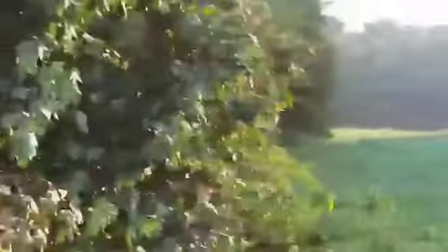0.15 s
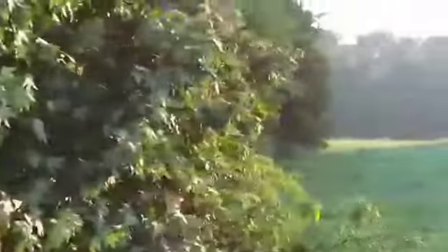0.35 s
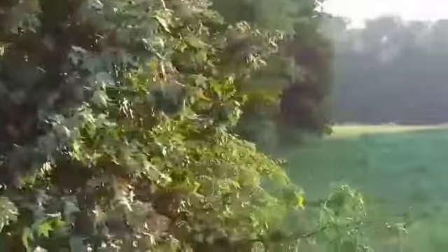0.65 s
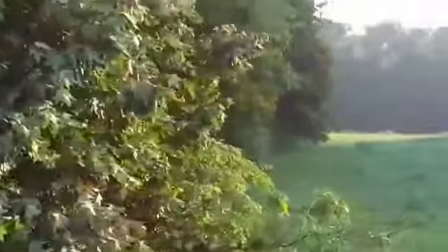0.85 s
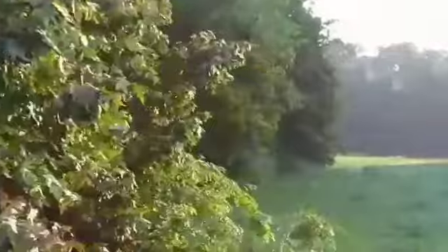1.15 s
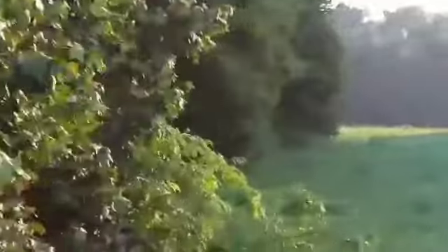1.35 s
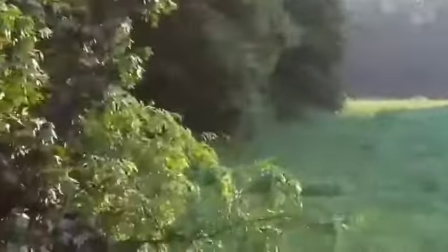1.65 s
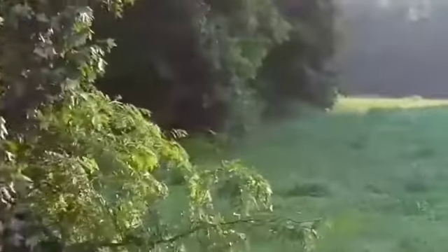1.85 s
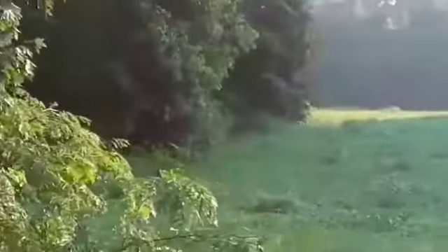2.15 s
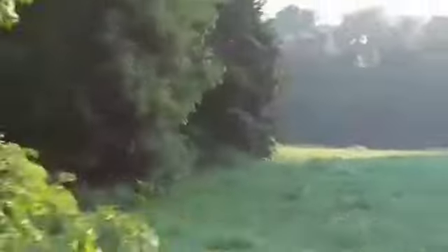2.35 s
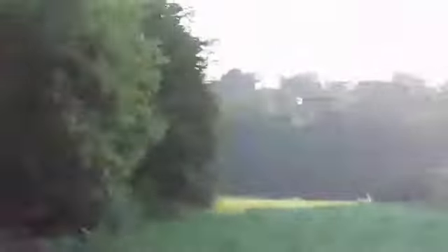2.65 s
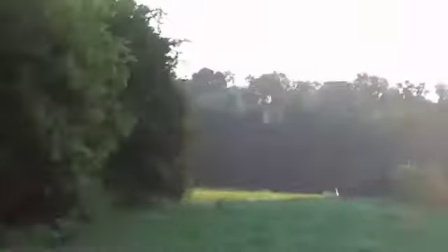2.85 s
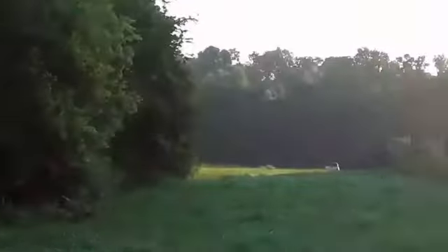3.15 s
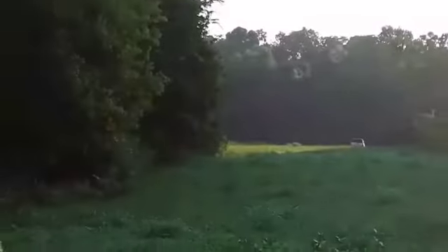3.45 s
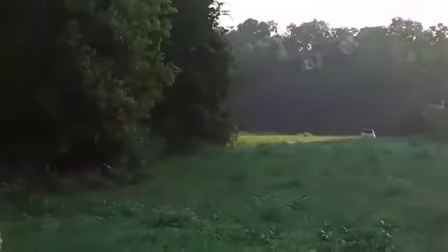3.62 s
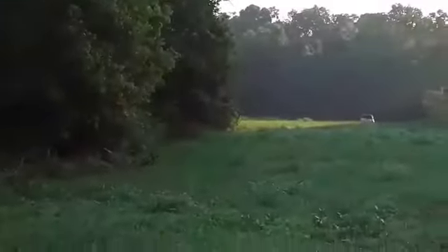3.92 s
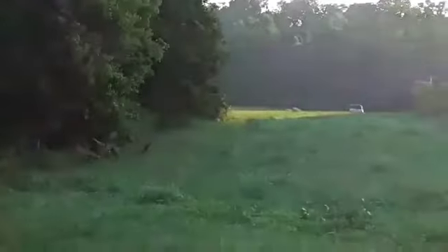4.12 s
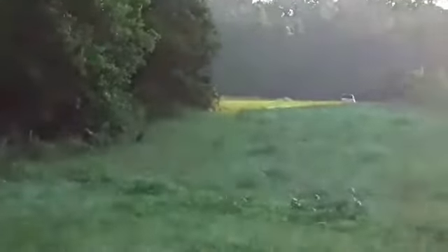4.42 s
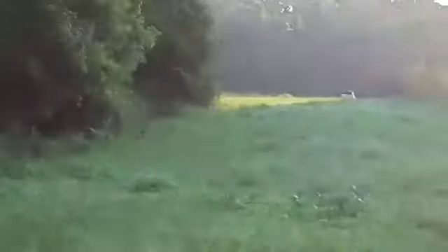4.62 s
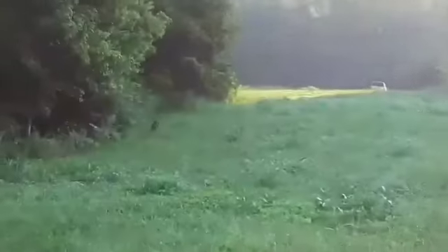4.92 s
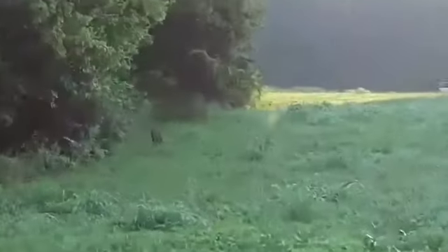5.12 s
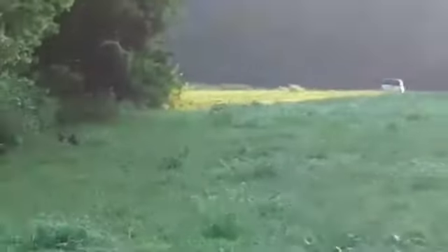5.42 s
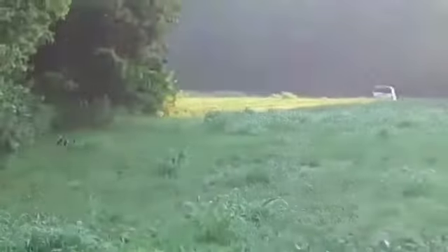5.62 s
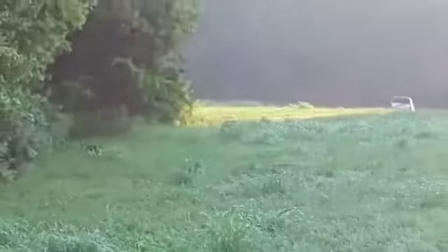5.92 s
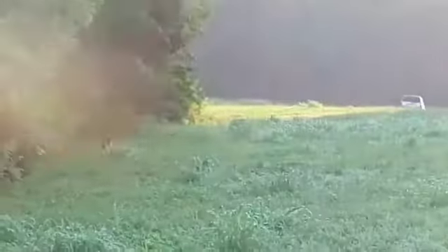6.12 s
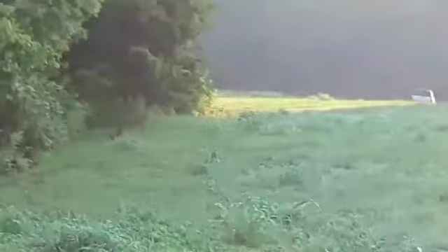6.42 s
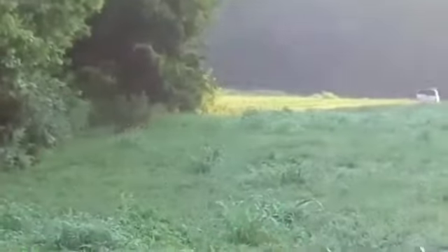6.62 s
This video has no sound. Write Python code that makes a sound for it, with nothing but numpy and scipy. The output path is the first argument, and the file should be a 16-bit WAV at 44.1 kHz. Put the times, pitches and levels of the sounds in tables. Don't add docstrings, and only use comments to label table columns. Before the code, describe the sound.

Outdoors, several distant hunting dogs yelp and howl almost continuously, overlapping, with brief gaps. Their voices leap, rasp and fall, with diffuse reflection from trees. Nearby grass rustles under steps, stalks crack and heels thud softly until about the middle. High pulsing cricket chirps and a steady insect chorus fill the background. Late on come faint bird notes and low motor flutter, caught by a handheld camera microphone with slight handling rumble.

```python
import sys
import numpy as np
from scipy import signal
from scipy.fft import rfft, irfft, next_fast_len
from scipy.io import wavfile
from scipy.ndimage import uniform_filter1d, map_coordinates

SR = 44100
rng = np.random.default_rng(int(sys.argv[2]) if len(sys.argv) > 2 else 0)


def voltage_ratio(decibels):
    exponent = np.asarray(decibels, float) / 20
    return 10 ** exponent


def wav_out(sig):
    wavfile.write(sys.argv[1], SR, np.round(np.clip(np.atleast_2d(sig).T, -1, 1) * 32767).astype(np.int16))


N = 298557
T = np.arange(N) / SR
COARSE = T[::16]

# start_s, pitch_hz, level_db, mouth_opening_db
FIRST_HOUND = [
    [(.21, 529.6, -42, -3), (.3, 695, -26.5, -29), (.35, 661, -26, -26), (.4, 580, -43.5, 6),
     (.48, 660.5, -35.5, -16.5), (.555, 643.5, -41, 2)],
    [(1.19, 622, -65, 0), (1.215, 755, -37, 3), (1.27, 670, -37.5, -11.5), (1.41, 683, -33, -8),
     (1.49, 673, -33.5, -11), (1.545, 574, -43.5, -6)],
    [(1.87, 854, -42, -13), (1.92, 690, -33, -5), (2.05, 675.4, -32.5, -24), (2.12, 646.7, -36.5, -11),
     (2.3, 607, -33.5, -5), (2.325, 603, -38, -4), (2.352, 558, -37, -26)],
    [(3.49, 757, -37.5, -27), (3.56, 676, -32.5, -10.5), (3.7, 603.6, -40, -3), (3.8, 616, -44, -8)],
    [(4.53, 626, -43, -15), (4.6, 733, -29.5, -35), (4.65, 624, -40.5, -4.5), (4.72, 575, -51, -25)],
    [(5.42, 748, -31.5, -8), (5.45, 689.5, -38, -2), (5.5, 684.4, -39, -4), (5.56, 686, -45.5, -8),
     (5.65, 746, -28.5, -19), (5.68, 737, -40, -4)],
]
SECOND_HOUND = [
    [(.62, 876, -36, -9), (.67, 683, -30, -15.5), (.75, 647.6, -35, -19), (.85, 642, -32, -22),
     (.927, 742, -35.5, -8)],
    [(1.595, 689, -36, -24), (1.63, 716, -25, -29), (1.72, 686, -37, -1.5), (1.75, 625, -32.5, -19.5),
     (1.91, 624.5, -29.5, -21)],
    [(3.8, 642, -36.5, -17), (3.85, 652, -30, -15.5), (3.95, 605.4, -36, -14), (4.08, 615, -37.5, -4.5),
     (4.2, 572.5, -47, 7.5)],
    [(5.14, 540, -51.5, 6), (5.2, 655, -27.5, -18.5), (5.24, 604, -31.5, -19), (5.285, 673.5, -27.5, -9.5),
     (5.33, 562, -35.5, -12), (5.44, 518, -59, -7)],
    [(6.02, 682, -50, 8), (6.05, 724, -36, -13), (6.1, 647.7, -54.5, 11), (6.15, 675.6, -31.5, -21.5),
     (6.2, 609, -38.5, 2), (6.26, 702, -36.5, -20)],
    [(6.29, 630, -41, 5), (6.45, 600.7, -31.5, -17), (6.6, 554.4, -41.5, -14)],
]
THIRD_HOUND = [
    [(2.575, 818, -34, -30), (2.66, 745, -31, -26), (2.7, 654, -33.5, -24), (2.88, 586, -29, -39),
     (2.97, 606, -49, -35), (3.07, 637.7, -33, -19), (3.1, 641, -44, -1), (3.12, 664, -26.5, -16),
     (3.17, 605, -30.5, -24), (3.24, 574, -47.5, -34)],
    [(2.85, 638, -38, -8), (3.17, 631, -43, -19)],
    [(3.92, 454.4, -69, 29.5), (4.12, 417, -69, 15.5), (4.22, 455, -61, 11)],
    [(4.24, 559, -54, 1), (4.3, 543, -36, -18), (4.38, 551, -46.5, -19)],
    [(6.25, 627.5, -52.5, 21.5), (6.29, 593, -55.5, 27.5), (6.39, 657, -55.5, 15.5), (6.42, 594, -54.5, 15),
     (6.445, 691, -28, -22), (6.47, 645, -55, -1), (6.5, 625, -46, 12.5)],
    [(6.6, 628, -39, -17), (6.66, 679, -48.5, -10), (6.73, 722, -34.5, -18)],
]
FOURTH_HOUND = [
    [(2.81, 457, -63, 25), (2.86, 447, -71, 16), (2.95, 441, -75, 16)],
    [(3.03, 519, -50, -4), (3.1, 550, -59, 2), (3.16, 584, -60, 14)],
    [(3.24, 590, -57, -18), (3.44, 650, -57, -18)],
    [(3.98, 583, -43, -20), (4.03, 560.6, -33.5, -27), (4.09, 560, -36.5, -23), (4.165, 572, -41, -20)],
    [(4.245, 712, -38, -20), (4.26, 733, -42.5, -24), (4.285, 720, -59, -23)],
    [(5.35, 1134, -29, -31), (5.375, 950.4, -30.5, -32), (5.41, 902.4, -35, -32), (5.44, 756, -31, -30)],
]
# time_s, third_harmonic_db, higher_harmonics_db
JAWS_FIRST_HOUND = [(.2, -5, 5), (.34, 10.5, 3), (.55, 21, 13), (1.199, 4, -14), (1.5, -3, -6),
                    (1.9, -14, -2), (2.05, 9, 4), (2.12, 9, -7), (2.22, 0, 12), (2.28, -6, -2),
                    (2.33, -1, 3), (3.5, -9, -18), (3.8, -17, -16), (4.6, 9, 3), (5.38, -5, -10),
                    (5.5, 5, -14), (5.62, 11.5, 2)]
JAWS_SECOND_HOUND = [(.62, -12, -15), (.72, 1, -15), (.8, 13.5, -10), (.92, 13, -4), (1.6, -4, -3),
                     (1.78, 0, 0), (1.8, 19, 6), (1.85, 16, 0), (1.88, 0, 0), (3.8, 0, 9), (3.9, 13, -7),
                     (4.05, -8, -5), (5.2, 12.5, 5), (5.3, 3, -21), (6.03, 7, -10), (6.11, 23, -9),
                     (6.2, 4, 0), (6.31, 11.5, -3), (6.4, -17, -7), (6.47, 6, -1)]
JAWS_FAR_HOUNDS = [(2.6, -1, -1), (2.85, 3, -17), (3.07, 7, -7), (3.1, 12, 2), (3.17, 12, -6),
                   (3.95, -9, -8), (4.3, -2, -7), (6.3, -6, 0), (6.7, 5, 4)]
# start_s, length_s, first_hz, last_hz, level_db
OPEN_YELPS = [(.181, 0.021, 326, 405, -37), (.197, 0.11, 517, 622, -39), (0.554, 0.041, 494, 574, -34),
              (0.926, 0.15, 584, 523, -34), (1.66, 0.04, 553, 666, -34.5), (3.665, 0.016, 490, 510, -41),
              (1.152, 0.04, 505, 562, -31), (1.185, 0.05, 637, 685, -37.5), (2.54, 0.048, 431, 591, -30.5),
              (3.44, 0.043, 536, 572, -32), (3.468, 0.028, 607, 643, -28), (3.8, 0.041, 416, 560, -33.5),
              (4.235, 0.072, 483.5, 551, -41.5), (4.449, 0.042, 492, 553, -34.5),
              (4.487, 0.026, 646, 651.5, -33), (5.116, 0.069, 370.2, 606, -35.5),
              (5.165, 0.037, 587.5, 592, -32), (5.32, 0.034, 494, 556, -27.5),
              (5.676, 0.074, 636, 552, -28.5), (5.73, 0.052, 596, 600, -49.5),
              (5.927, 0.11, 460, 631, -30.5), (6.208, 0.1, 416, 564, -40.5), (6.735, 0.041, 527, 588, -46)]
# start_s, length_s, first_hz, last_hz, level_db
SHRILL_YELPS = [
    (.205, 0.043, 545, 578, -48.5),
    (2.6, 0.059, 525, 595, -40.5),
    (1.555, 0.0538, 400, 640, -41.5),
    (1.815, 0.0546, 350, 539, -42.5),
]
# time_s, third_harmonic_db, higher_harmonics_db
JAWS_OPEN_YELPS = [(.2, -8, -9), (.56, -6, -9), (.95, 8.5, 0), (1.16, 3.5, 3.5), (2.55, -4, -2),
                   (3.45, -5, 0), (3.48, -12, -2), (3.82, -9, 4.5), (4.46, 3.5, 3), (5.13, 4, -4),
                   (5.33, -4, -12), (5.7, -17, -1.5), (5.94, -1, 4), (6.0, 0, -5), (6.24, 12.5, 10),
                   (6.74, -12, -7)]
JAWS_SHRILL_YELPS = [
    (.22, -11, 3.5),
    (1.58, 5, 1),
    (1.84, 0, 2.5),
    (2.62, -11, -2.5),
]
# start_s, hold_s, level_db, mouth_against_throat_db
VOICE_CRACKS = [(0.211, 0.13, -40, -35), (0.535, 0.017, -52.5, 15.5), (0.604, 0.067, -35, -16.5),
                (0.945, 0.048, -57, 9), (1.19, 0.068, -42.5, -5.5), (1.439, 0.0092, -43, -4),
                (1.574, 0.13, -42.5, 2), (1.829, 0.071, -38, -0.5), (1.962, 0.083, -40.5, -3),
                (2.575, 0.15, -34.5, -3.5), (2.74, 0.29, -44.5, -48), (3.479, 0.038, -40, -8),
                (3.706, 0.018, -53, 12.5), (3.805, 0.11, -49.5, -13), (4.235, 0.079, -53.5, 1),
                (4.483, 0.046, -48, -1), (4.593, 0.051, -37.5, -15.5), (5.169, 0.04, -44.5, -14),
                (5.332, 0.056, -39.5, -7), (5.443, .09, -56, -11), (2.321, 0.02, -52, 1.5),
                (5.697, 0.022, -48.5, 3.5), (6.012, 0.087, -46, -4.5), (6.217, 0.11, -44.5, -4),
                (6.376, 0.25, -49, -4.5)]
# start_s, hold_s, level_db
HOARSE_CRACKS = [
    (.6, 0.04, -38.5),
    (1.2, 0.082, -43),
    (1.85, 0.038, -49),
    (1.93, 0.02, -42),
    (2.56, 0.033, -36.5),
    (5.355, 0.053, -29.5),
    (6.03, 0.032, -49),
]
# centre_hz, width_hz, level_db
THROAT_MODES = [(691, 255, -1.5), (1082, 642, 2), (1264, 594, 0.5)]
MOUTH_MODES = [(1546, 503, 3), (2306, 600, 4), (2783, 830, 0.5)]
RAISED_LARYNX_MODES = [(970, 320, 0)]
# start_s, hold_s, level_db
DISTANT_CRIES = [
    (.56, 0.19, -46.5),
    (3.33, 0.23, -54),
    (4.27, 0.074, -54.5),
]
# frequency_hz, decay_t60_s
TREE_DECAY = [(400, 0.4), (1500, 0.31), (4000, 0.14)]
# time_s, peak_db
TWIG_SNAPS = [(.499, -32), (.5082, -30), (0.5437, -33), (0.5656, -46), (0.5767, -36), (1.4441, -50),
              (1.7729, -28), (1.7864, -30.5), (2.1695, -37.5), (2.4668, -40), (2.7053, -27), (2.7174, -29),
              (2.7494, -30), (2.7801, -32), (2.7935, -26.5), (2.8744, -34.5), (2.8903, -37.5),
              (3.2543, -38), (3.7234, -29), (4.7287, -41.5), (5.8921, -51), (6.6483, -43)]
# start_s, hold_s, level_db
STRIDES = [(.27, 0.031, -63.5), (.88, 0.046, -61.5), (1.15, 0.0028, -59), (1.42, 0.15, -60),
           (1.9, 0.063, -65), (2.03, 0.042, -56.5), (2.5, 0.12, -60), (3.07, 0.12, -59.5), (3.5, 0.16, -63),
           (4.06, 0.057, -66), (6.08, 0.14, -70.5)]
# time_s, peak_db
STALK_CRACKS = [
    (1.1416, -33),
    (1.4052, -27.5),
    (2.0393, -35),
    (3.0215, -40),
    (5.8526, -54),
    (1.913, -28.5),
    (2.0606, -30.5),
    (2.4668, -34),
    (3.1642, -26),
    (3.1931, -27.5),
]
# time_s, peak_db
HEEL_THUDS = [
    (.5, -49),
    (1.264, -41),
    (2.65, -45),
    (3.139, -36),
]
# frequency_hz, density_db_per_hz
GRASS_SPECTRUM = [(150, -16.5), (350, 4), (1200, 4.5), (4000, -10), (8500, -9.5), (10100, -15.5),
                  (12900, -5.5), (15500, -9.5)]
# start_s, peak_db
HIGH_CHIRPS = [(0.1344, -53), (0.3576, -53), (0.4477, -56), (0.6437, -49), (0.849, -48.5), (0.9203, -56),
               (1.0181, -53.5), (1.1912, -55), (1.314, -54), (1.5594, -53), (1.723, -51.5), (2.0083, -52),
               (2.146, -55), (2.2486, -51.5), (2.3, -54), (1.245, -64), (2.5436, -53), (2.6473, -45),
               (2.8337, -47), (3.021, -51), (3.1502, -51), (5.108, -47), (5.331, -52.5), (5.5464, -44),
               (5.7468, -45), (5.9643, -46.5), (6.1544, -47), (6.3588, -50.5)]
LOW_CHIRPS = [(1.1042, -58), (1.4108, -58), (2.4723, -58), (2.9372, -59), (3.365, -56), (3.8113, -61),
              (1.79, -55.5), (2.705, -57), (3.9864, -59), (4.156, -58.5), (4.3038, -62), (4.414, -58.5),
              (4.56, -55), (4.7067, -58), (4.844, -59.5), (4.9901, -63), (5.275, -57), (5.4166, -58),
              (5.9299, -55)]
TINY_CHIRPS = [
    (4.5336, -55),
    (4.6788, -58),
    (4.8344, -60),
]
# start_s, length_s, start_hz, farthest_hz, level_db
BIRD_NOTES = [(4.999, 0.028, 4670, 4540, -67), (5.06, 0.034, 4600, 4540, -65),
              (5.272, 0.092, 4780, 3950, -66), (5.37, 0.052, 4600, 4000, -74),
              (5.467, .075, 3500, 4370, -66), (5.55, 0.057, 3500, 4430, -68),
              (5.645, 0.084, 3580, 4470, -78), (5.82, 0.085, 3100, 4264, -67),
              (5.915, 0.068, 3580, 4370, -72), (5.98, 0.06, 3620, 4870, -69), (6.22, .03, 3700, 4000, -68),
              (6.3, .035, 3700, 4000, -71), (6.1, .05, 4400, 5200, -66), (6.335, 0.059, 4530, 5300, -62.5),
              (4.28, 0.42, 11760, 11700, -75)]
# start_s, length_s, first_hz, last_hz, level_db
BRANCH_WHIPS = [
    (0.504, 0.0096, 1890, 1140, -31.5),
    (3.084, .05, 2257, 2700, -50),
    (3.197, 0.021, 3830, 2200, -47),
    (3.684, .035, 3100, 1490, -42.5),
    (4.335, .03, 1700, 1190, -51),
    (5.889, 0.013, 1600, 1770, -41),
    (6.736, 0.019, 1540, 1630, -46),
    (1.278, 0.18, 2210, 2300, -53.5),
]
# frequency_hz, density_db_per_hz
AIR_SPECTRUM = [(25, -43), (98, 11.5), (226, -22), (708, -21), (2220, -2.5), (3690, -23), (6240, -47),
                (10600, -120)]
# centre_hz, width_hz, level_db
CHORUS_MODES = [(5833, 750, -2), (6685, 480, -2.5), (8310, 1100, -2.5)]
# time_s, level_db
HANDLING_LEVEL = [
    (0.0, -64),
    (.2, -61.5),
    (.5, -56.5),
    (4.9, -61.5),
    (5.56, -63),
    (6.77, -56),
]
# start_s, end_s, rate_per_s, level_db
ZOOM_THROBS = [
    (4.52, 4.74, 30, -40.5),
    (5.08, 5.796, 32, -44.5),
]

UPPER_DB, UPPER_GROWS = -13, 0.64
YELP_FIRST_DB, YELP_UPPER_DB = -20, -11
YELP_HIGHER_DB = 1
YELP_UPPER_FADE = 64
SWELL_DB, FADE_DB = 5, 27
RASP_RISE, RASP_FALL = 1040, 520
BREATH_DB, FAR_PACK_DB = -22.5, -65
STRIDE_RISE, STRIDE_FALL = 215, 150
WALKING_DB, STANDING_DB, HALT_S = -70, -74, 4.16
SAG_HZ = 110


def unit(x):
    return x / np.sqrt(np.mean(x ** 2) + 1e-20)


def along(points, hz):
    f, v = np.transpose(points)
    return np.interp(np.log(hz + 1), np.log(f + 1), v)


def curves(rows, t=T):
    s, *cols = np.transpose(rows)
    return [np.interp(t, s, c) for c in cols]


def fine(curve):
    return np.interp(T, COARSE, curve)


def wobble(rate):
    knots = rng.standard_normal(int(N * rate / SR) + 4)
    return fine(map_coordinates(knots, [COARSE * rate]))


def swells(rows, rise, fall):
    gains = []
    for s, hold, db, *_ in rows:
        before, after = np.clip(s - COARSE, 0, 1), np.clip(COARSE - s - hold, 0, 1)
        gains.append(voltage_ratio(db - rise * before - fall * after))
    return np.array(gains)


def filtered(x, response):
    m = next_fast_len(N + SR // 2)
    return irfft(rfft(x, m) * response(np.fft.rfftfreq(m, 1 / SR)), m)[:N]


def resonances(modes):
    def response(f):
        return sum((-1) ** k * voltage_ratio(db) * 1j * f * w / (c * c - f * f + 1j * f * w)
                   for k, (c, w, db) in enumerate(modes))
    return response


def pulses(rate, scatter_db):
    beats = np.diff(np.floor(np.cumsum(rate) / SR), prepend=0)
    return beats * voltage_ratio(scatter_db * rng.standard_normal(N))


def hits(events):
    s, db = np.transpose(events)
    return np.bincount(np.round(s * SR).astype(int), voltage_ratio(db), N)[:N]


def meadow():
    hush = unit(filtered(rng.standard_normal(N), lambda f: voltage_ratio(along(AIR_SPECTRUM, f))))
    chorus = unit(filtered(rng.standard_normal(N), lambda f: resonances(CHORUS_MODES)(f) ** 3))
    hush_db = -67.0 + wobble(2.7)
    chorus_db = -60.5 + 0.99 * wobble(12.0) + 1.8 * wobble(110)
    return voltage_ratio(hush_db) * hush + voltage_ratio(chorus_db) * chorus


def camera():
    casing = resonances([(118.0, 98, 19.0), (318, 1500, -29.0)])
    rumble_db = curves(HANDLING_LEVEL)[0] - 3.0 + 2.8 * wobble(24)
    rumble = voltage_ratio(rumble_db) * unit(filtered(rng.standard_normal(N), casing))
    throbs = np.zeros(N)
    for start, end, rate, db in ZOOM_THROBS:
        running = (T > start) & (T < end)
        throbs += voltage_ratio(db + 3.5) * running * pulses(rate * (1 + 0.15 * wobble(22)), scatter_db=6.0)
    return rumble + filtered(throbs, lambda f: casing(f) ** 2)


def steps():
    rustle = voltage_ratio(np.where(T < HALT_S, WALKING_DB, STANDING_DB) + 1.24 * wobble(5.4))
    stride_db = 20 * np.log10(fine(swells(STRIDES, STRIDE_RISE, STRIDE_FALL).sum(axis=0)) + rustle)
    grain_db = 2.83 * np.clip((stride_db + 84.0) / 14, 0, 1)
    bursts = np.minimum(rng.exponential(size=N), 7) - 0.8 + 0.83 * wobble(120)
    ticks = rng.standard_normal(N) * voltage_ratio(grain_db * bursts)
    swish = voltage_ratio(stride_db + 11.5) * unit(filtered(ticks, lambda f: voltage_ratio(along(GRASS_SPECTRUM, f))))
    heels = voltage_ratio(42.5) * filtered(hits(HEEL_THUDS), lambda f: resonances([(185, 70, 0)])(f) ** 2)
    stalks = voltage_ratio(11.0) * filtered(hits(STALK_CRACKS), resonances([(12600, 5500, 0.0052)]))
    return swish + heels + stalks


def even_beat(start_s, gap_s, count, level_db):
    return [(start_s + gap_s * k, level_db) for k in range(count)]


def crickets(chirps, wing_hz, length, gain_db):
    out, t = np.zeros(N + SR), np.arange(round(length * SR)) / SR
    swell = np.clip(np.minimum(t / 0.0031, (t[-1] - t) / 0.02), 0, 1)
    for (s, db), (pace, pitch) in zip(chirps, rng.standard_normal((len(chirps), 2))):
        strokes = np.abs(np.sin(np.pi * (102 + 3 * pace) * t)) ** 1.6
        hz = wing_hz + 60 * pitch + SAG_HZ * (1 - t / length)
        tone = np.sin(2 * np.pi * hz * t + 1.1 * strokes)
        out[round(s * SR):][:len(t)] += voltage_ratio(db + gain_db) * swell * strokes * tone
    return out[:N] * (1 + 0.043 * wobble(310))


def yelps(table, upper_db, higher_db, jaws):
    out, u = [], np.linspace(0, 1, num=7)
    for s, length, first_hz, last_hz, db in table:
        t = s + length * u
        rising = last_hz > first_hz
        level_db = db - (SWELL_DB * (1 - u) ** 2 if rising else FADE_DB * u)
        hz = first_hz + (last_hz - first_hz) * (1 - (1 - u) ** 1.7)
        jaw_third_db, jaw_higher_db = curves(jaws, t)
        upper = level_db + upper_db - YELP_UPPER_FADE * length * u
        out.append(np.transpose([t, hz, level_db + YELP_FIRST_DB, level_db,
                                 upper + jaw_third_db, upper + higher_db + jaw_higher_db]))
    return out


def dense(rows):
    s = np.union1d(np.linspace(rows[0][0], rows[-1][0], num=24), np.transpose(rows)[0])
    return np.transpose([s, *curves(rows, s)])


def held_notes(table, jaws):
    out = []
    for rows in map(dense, table):
        note = []
        for s, hz, db, mouth_db in rows:
            third_db, higher_db = db + UPPER_GROWS * mouth_db + UPPER_DB + np.array(curves(jaws, s))
            note.append((s, hz, db, db + mouth_db, third_db, higher_db))
        out.append(note)
    return out


def howls(table, jitter, flutter_db, shimmer_db, steady, onset_s=.004):
    out, shake = np.zeros(N), jitter * (wobble(70) + wobble(18))
    beat_first = voltage_ratio(flutter_db * wobble(45))
    beat_second = voltage_ratio(1.33 * flutter_db * wobble(35)) * (1 + 0.23 * wobble(110))
    shine = [voltage_ratio(shimmer_db * wobble(25) - 2.05 * k ** 1.13) * (steady + 0.48 * wobble(90)) for k in range(3)]
    mouth = resonances(MOUTH_MODES)
    for rows in table:
        on = slice(round(rows[0][0] * SR), min(round(rows[-1][0] * SR), N))
        t = T[on]
        hz, first_db, second_db, third_db, higher_db = curves(rows, t)
        phase = 2 * np.pi * np.cumsum(hz * (1 + shake[on])) / SR
        upper = 0
        for k in range(3):
            level = shine[k][on] * voltage_ratio(higher_db if k else third_db)
            upper = upper + level * np.abs(mouth((k + 3) * hz)) ** k * np.sin((k + 3) * phase)
        first = voltage_ratio(first_db) * beat_first[on] * np.sin(phase)
        second = voltage_ratio(second_db) * beat_second[on] * np.sin(2 * phase)
        edge = np.clip(np.minimum((t - t[0]) / onset_s, (t[-1] - t) / 0.0027), 0, 1)
        out[on] += np.sqrt(2) * edge * (first + second + voltage_ratio(-3.0) * upper)
    return out


def rasp(clear):
    cracks = swells(VOICE_CRACKS, RASP_RISE, RASP_FALL)
    loudness = np.sqrt(np.abs(uniform_filter1d(clear ** 2, size=2000)))
    under = voltage_ratio(BREATH_DB) * loudness + voltage_ratio(FAR_PACK_DB)
    throat = fine(cracks.sum(axis=0)) + under
    mouth_share = voltage_ratio(np.transpose(VOICE_CRACKS)[-1])
    mouth = fine(mouth_share @ cracks) + voltage_ratio(-2.5) * under
    raised = fine(swells(HOARSE_CRACKS, RASP_RISE, RASP_FALL).sum(axis=0))
    slaps = np.zeros(N)
    for hz in (310, 470, 620):
        train = pulses(hz * np.exp(.09 * wobble(30)), scatter_db=3.5)
        slaps += train * np.abs(1 + 0.5 * wobble(60))
    folds = unit(slaps) + .16 * rng.standard_normal(N)

    def through(modes):
        return unit(filtered(folds, lambda f: resonances(modes)(f) ** 2))

    voiced = voltage_ratio(0.5) * throat * through(THROAT_MODES) - -voltage_ratio(-0.5) * mouth * through(MOUTH_MODES)
    return voiced + raised * through(RAISED_LARYNX_MODES)


def trees(x):
    hz, t, z = signal.stft(rng.standard_normal(SR), SR, nperseg=256)
    decay = voltage_ratio(-60 * t / along(TREE_DECAY, hz)[:, None])
    tail = signal.istft(z * decay, SR, nperseg=256)[1]
    delayed = np.pad(x, (600, 0))
    return signal.fftconvolve(delayed, tail / np.linalg.norm(tail))[:N]


def undergrowth():
    wood = resonances([(1700, 1300, 0), (3000, 1200, -2)])
    return voltage_ratio(28.0) * filtered(hits(TWIG_SNAPS), lambda f: wood(f) ** 2)


def whistles(table):
    out = np.zeros(N)
    for s, length, start_hz, far_hz, db in table:
        u = np.linspace(0, 1, round(length * SR))
        arched = length > .07 and far_hz > start_hz
        bend = np.sin(np.pi * u / (1 if arched else 2))
        phase = 2 * np.pi * np.cumsum(start_hz + (far_hz - start_hz) * bend) / SR
        out[round(s * SR):][:len(u)] += voltage_ratio(db) * np.sqrt(np.abs(np.sin(np.pi * u))) * np.sin(phase)
    return out * voltage_ratio(3.4 * wobble(70))


def distant():
    phase = 2 * np.pi * np.cumsum(1640 * (1 + 0.0267 * wobble(60))) / SR
    level = fine(swells(DISTANT_CRIES, RASP_RISE, RASP_FALL).sum(axis=0))
    return level * voltage_ratio(10.2 * wobble(25)) * np.sin(phase)


def scene():
    clear = howls(held_notes(FIRST_HOUND, JAWS_FIRST_HOUND),
                  jitter=0.01186, flutter_db=2.5, shimmer_db=4.0, steady=0.74)
    clear += howls(held_notes(SECOND_HOUND, JAWS_SECOND_HOUND),
                   jitter=0.01285, flutter_db=2.0, shimmer_db=1.5, steady=0.89)
    clear += howls(held_notes(THIRD_HOUND + FOURTH_HOUND, JAWS_FAR_HOUNDS),
                   jitter=0.01097, flutter_db=4.0, shimmer_db=0.5, steady=0.38)
    cries = yelps(OPEN_YELPS, YELP_UPPER_DB, YELP_HIGHER_DB, JAWS_OPEN_YELPS)
    cries += yelps(SHRILL_YELPS, upper_db=0.0, higher_db=7.5, jaws=JAWS_SHRILL_YELPS)
    clear += howls(cries, jitter=0.0096, flutter_db=1.5, shimmer_db=1.5, steady=1.22, onset_s=0.0068)
    pack = clear + rasp(clear) + distant()

    shrill = even_beat(0.034, 0.158, 5, -50.5) + [(.9, -50.5), (1.085, -50.5)]
    steady = even_beat(3.555, .169, 9, -55.5)
    deep = even_beat(4.99, .163, 11, -57.5)
    insects = crickets(HIGH_CHIRPS, wing_hz=8320, length=0.0686, gain_db=1.5)
    insects += crickets(LOW_CHIRPS, wing_hz=8130, length=0.045, gain_db=9.0)
    insects += crickets(shrill, wing_hz=8700, length=0.067, gain_db=-0.5)
    insects += crickets(deep, wing_hz=7880, length=0.062, gain_db=1.5)
    insects += crickets(TINY_CHIRPS, wing_hz=11050, length=.025, gain_db=-1.0)
    insects += crickets(steady, wing_hz=8030, length=.07, gain_db=-1.5)

    far = pack + undergrowth() + whistles(BIRD_NOTES + BRANCH_WHIPS) + insects
    return (far + voltage_ratio(-12.5) * trees(far) + steps() + meadow() + camera())[None]


def roll_off(x):
    return signal.sosfilt(signal.butter(12, 15600, fs=SR, output="sos"), x)


def record(dry):
    top_hz = 15600
    mix = filtered(dry[0], lambda f: f < top_hz)[None]
    return roll_off(mix)


dry = scene()
out = record(dry)
wav_out(out)
```